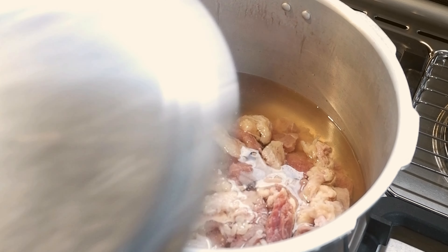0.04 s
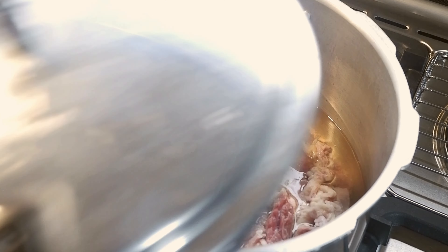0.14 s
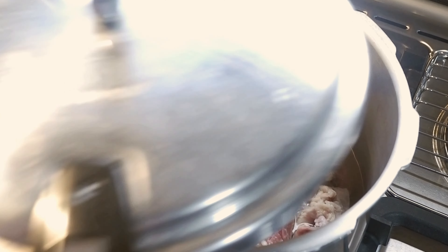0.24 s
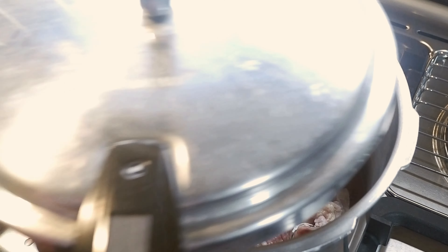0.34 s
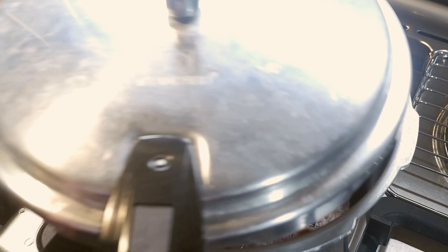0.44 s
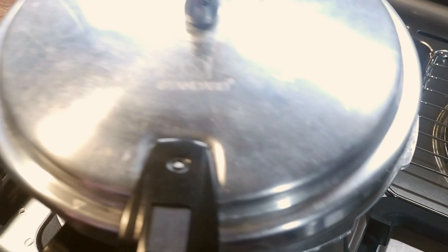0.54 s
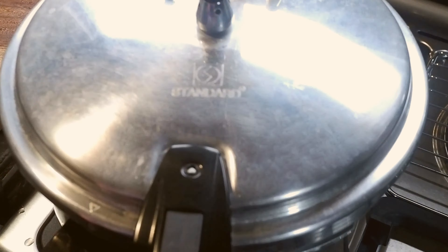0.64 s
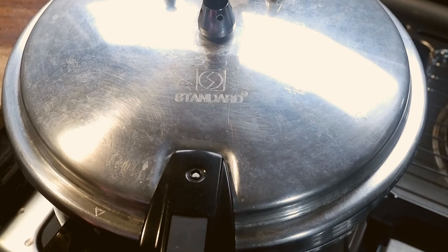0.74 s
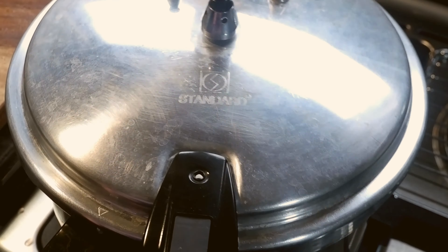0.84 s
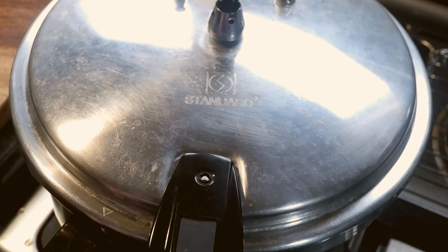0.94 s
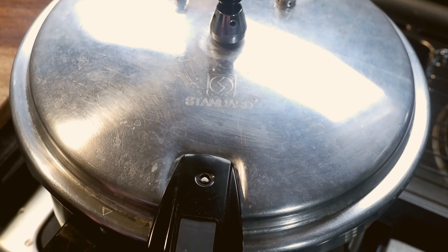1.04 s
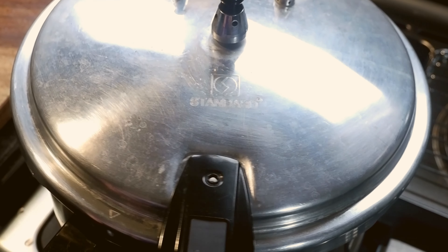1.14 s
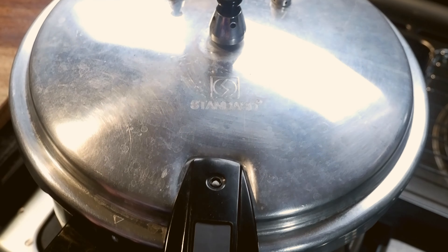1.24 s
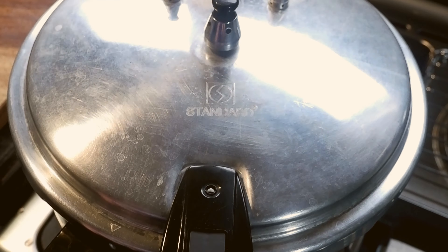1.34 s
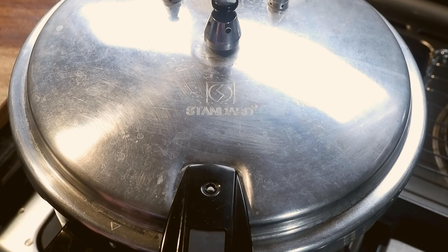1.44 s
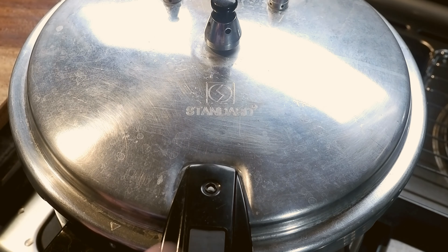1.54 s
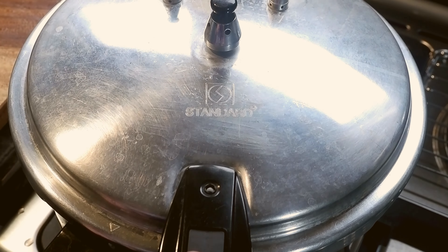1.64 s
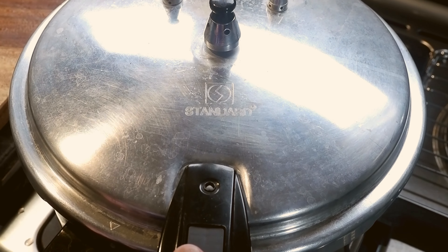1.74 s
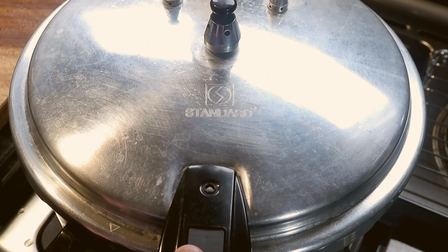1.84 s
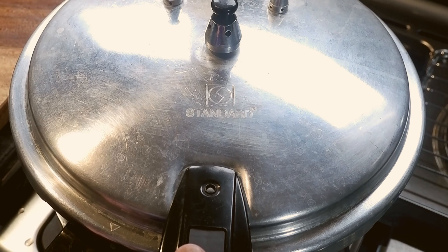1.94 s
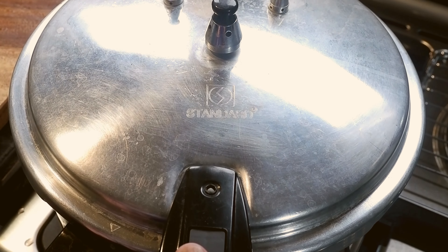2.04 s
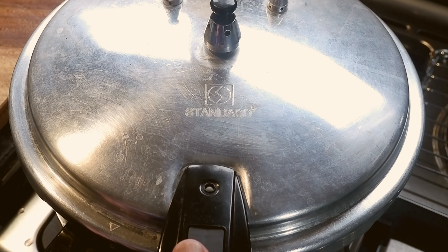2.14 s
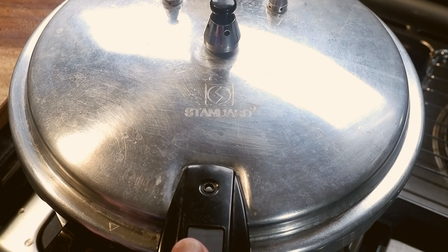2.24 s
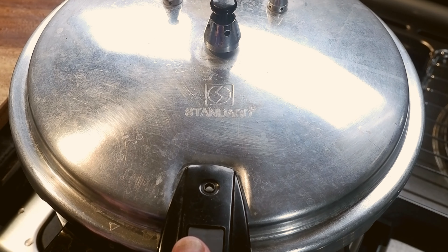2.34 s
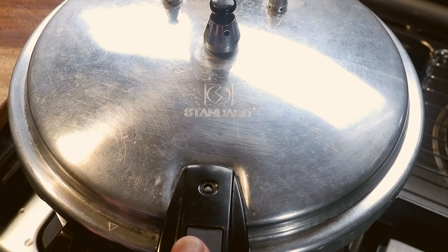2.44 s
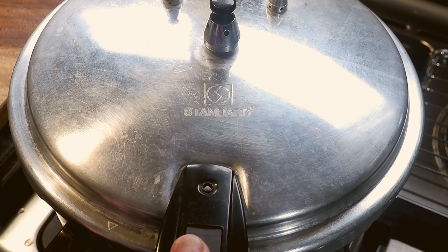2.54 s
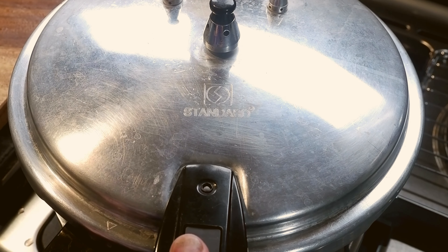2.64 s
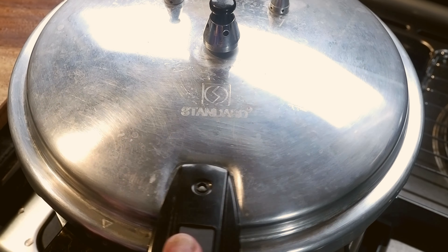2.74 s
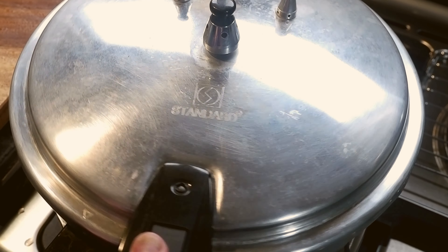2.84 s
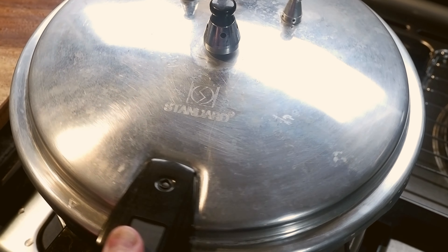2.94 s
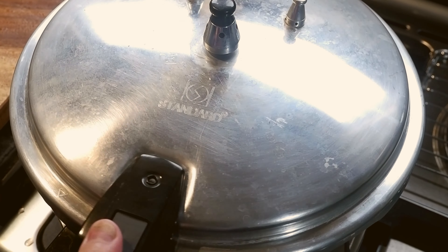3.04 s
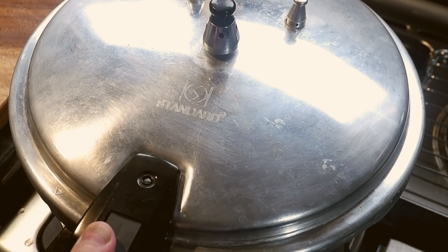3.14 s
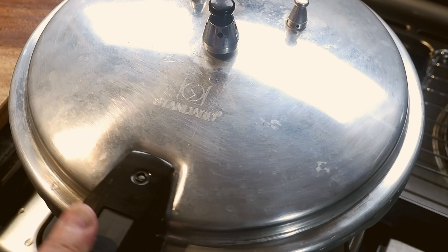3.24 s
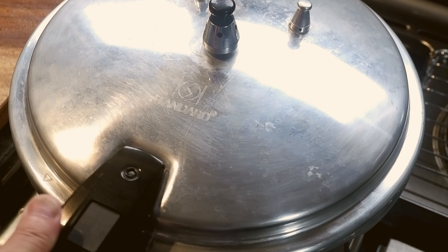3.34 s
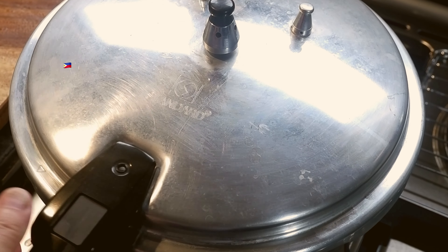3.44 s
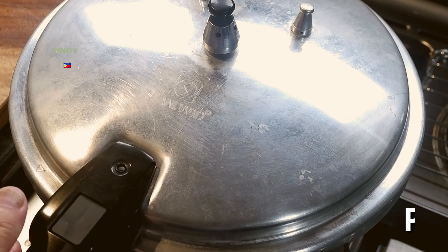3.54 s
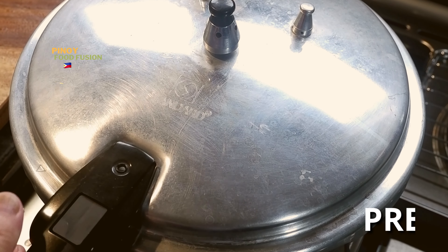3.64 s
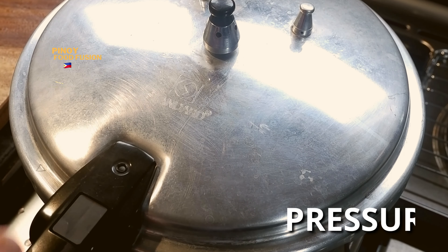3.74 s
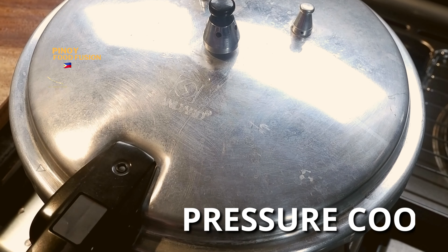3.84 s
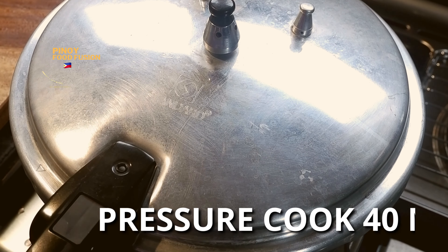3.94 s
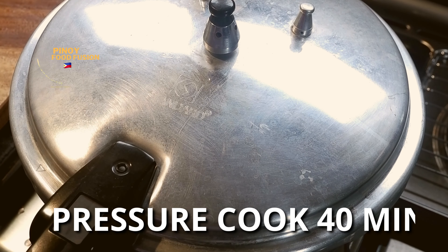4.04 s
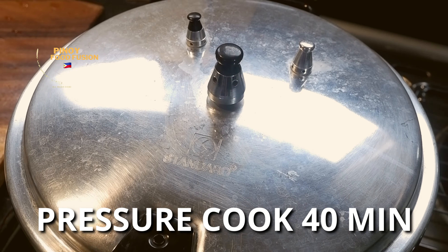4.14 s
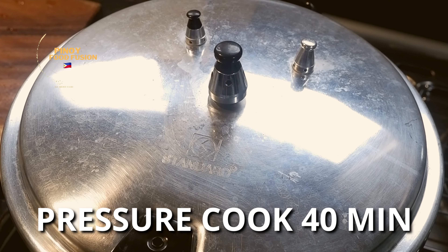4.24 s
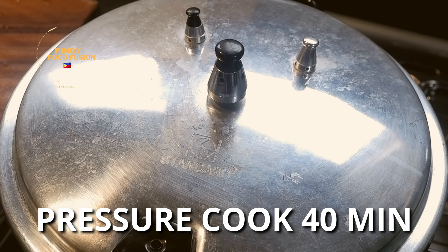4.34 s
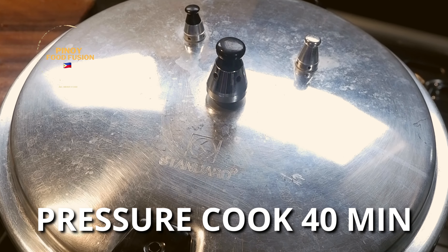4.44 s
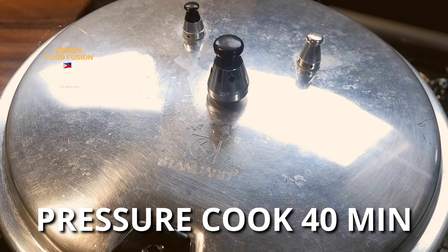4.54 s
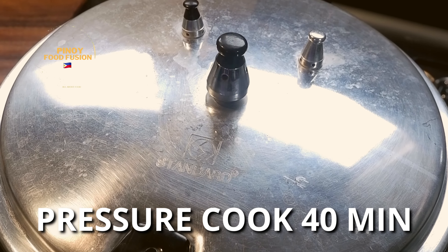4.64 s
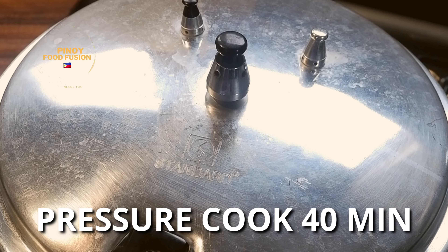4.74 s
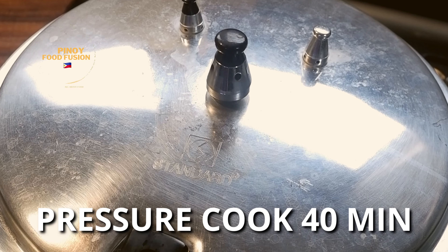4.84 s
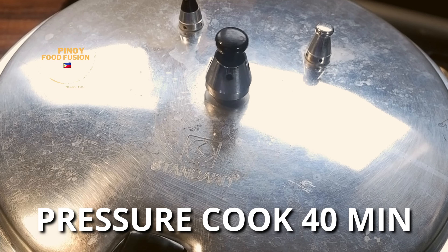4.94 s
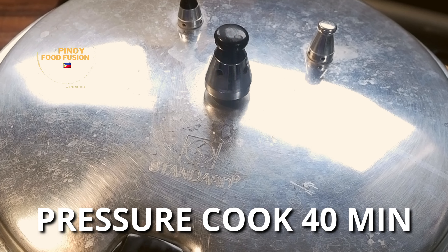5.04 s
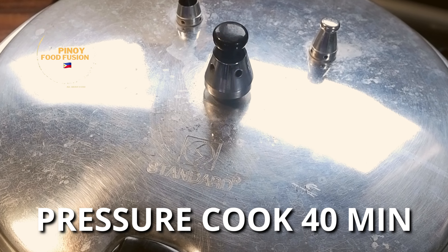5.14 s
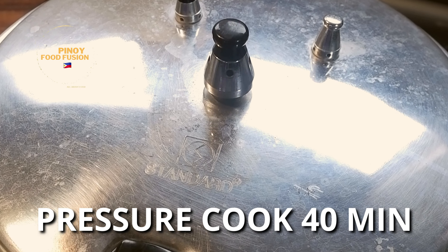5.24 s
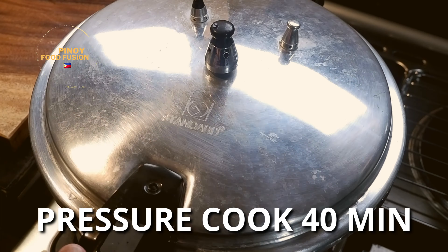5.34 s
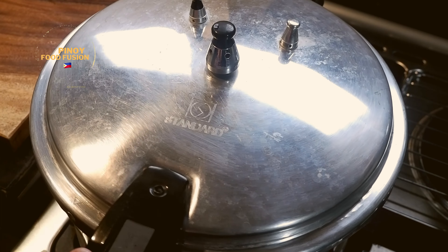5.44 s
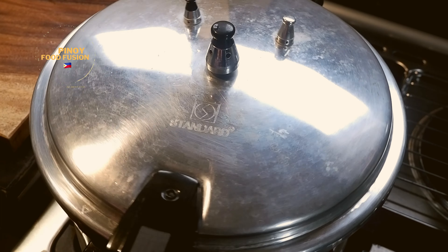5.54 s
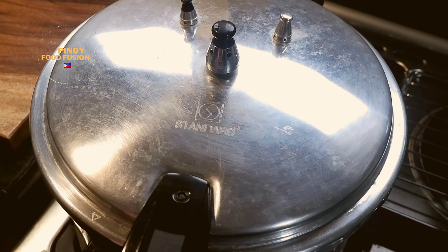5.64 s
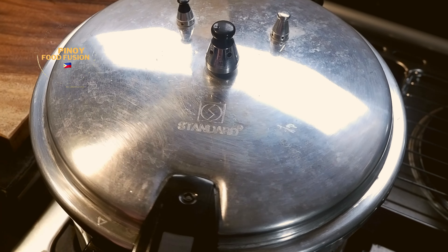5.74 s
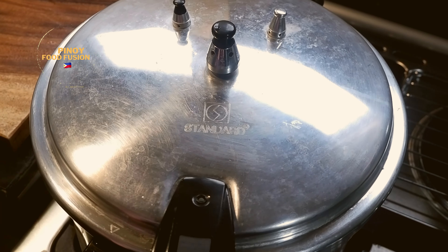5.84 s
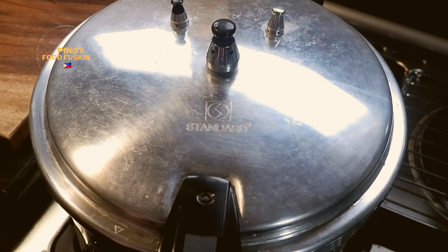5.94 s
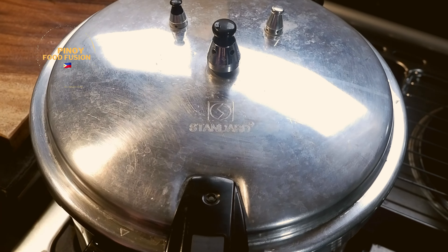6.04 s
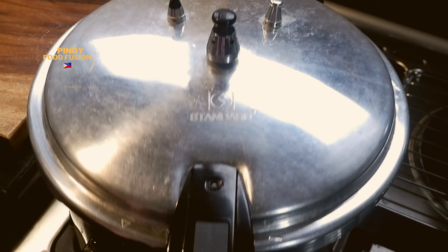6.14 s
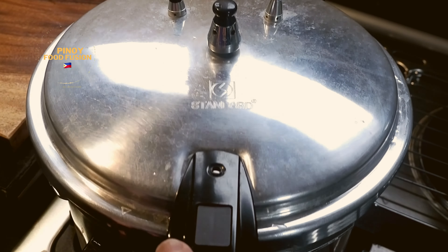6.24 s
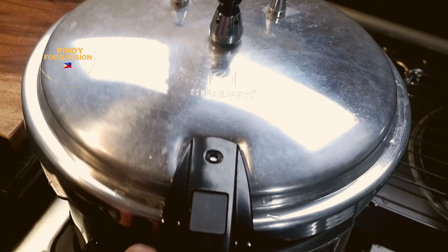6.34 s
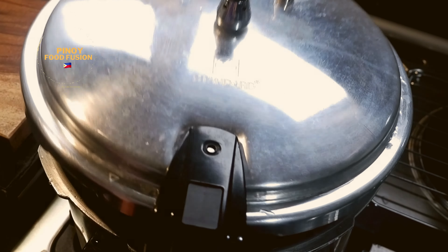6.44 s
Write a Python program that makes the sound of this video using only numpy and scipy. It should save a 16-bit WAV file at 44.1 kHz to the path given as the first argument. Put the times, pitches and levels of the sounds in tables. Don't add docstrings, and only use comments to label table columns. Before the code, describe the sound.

A heavy metal lid knocks and rattles onto a pot, grinds shut with a sharp click, then steam hisses before the lid is turned open.

```python
import sys
import numpy as np
from scipy import signal
from scipy.fft import rfft, irfft, next_fast_len
from scipy.io import wavfile
from scipy.ndimage import uniform_filter1d

SR = 44100
rng = np.random.default_rng(int(sys.argv[2]) if len(sys.argv) > 2 else 0)


def unload_audio(sound):
    columns = np.transpose(np.atleast_2d(sound))
    steps = np.round(np.clip(columns, -1, 1) * 32767)
    wavfile.write(sys.argv[1], SR, steps.astype(np.int16))


def undo_db(level):
    steps = np.asarray(level, float) / 20
    return 10 ** steps


N = 286694
SIZE = next_fast_len(N)
HZ = np.fft.rfftfreq(SIZE, 1 / SR) + 1
T = np.arange(N) / SR


def unit(x):
    return x / np.sqrt(np.mean(x ** 2))


def curve(points, column=1):
    return np.interp(T, np.array(points)[:, 0], np.array(points)[:, column])


def gate(start_s, end_s, edge_s):
    return np.clip(np.minimum(T - start_s, end_s - T) / edge_s + 1, 0, 1)


def away(s, before_s, after_s):
    return np.where(T < s, (s - T) / before_s, (T - s) / after_s)


def colour(points):
    hz, db = np.transpose(points)
    return undo_db(np.interp(np.log(HZ), np.log(hz), db))


def shaped(x, gain):
    return irfft(rfft(x, SIZE) * gain, SIZE)[..., :N]


def band(x, lo_hz, hi_hz):
    return signal.sosfilt(signal.butter(2, [lo_hz, hi_hz], "band", fs=SR, output="sos"), x)


def add(out, s, x, db):
    i = int(s * SR)
    out[:, i:i + x.shape[1]] += undo_db(db) * x / np.abs(x).max()


def walk(rate):
    k = int(SR / rate)
    held = np.repeat(rng.standard_normal(N // k + 1), k)
    return 1.76 * uniform_filter1d(uniform_filter1d(held, k), k)[:N]


def port_noise(n, own):
    noise = rng.standard_normal((3, n))
    return noise[0] + own * noise[1:]


def wide_noise(side_hz):
    mid, side = rfft(rng.standard_normal((2, SIZE)))
    side = side * (HZ + .12 * side_hz) / (HZ + side_hz)
    return np.array([mid + side, mid - side])


def flickering(spec, lo_hz, hi_hz, flicker_db, rate):
    def below(hz):
        return 1 / (1 + (HZ / hz) ** 8)

    out = 0
    for hz in lo_hz * 2. ** np.arange(np.ceil(np.log2(hi_hz / lo_hz))):
        octave = below(min(2 * hz, hi_hz)) - below(hz)
        out = out + undo_db(flicker_db * walk(rate)) * irfft(spec * octave, SIZE)[:, :N]
    return unit(out)


def ring(modes, t, db, stretch, chance):
    hz, own_db, t60 = np.transpose(modes)[:, :, None]
    size = undo_db(own_db + db[:, None] - 60 * t / (t60 * stretch))
    port = np.array([1, -1])[:, None, None]
    phase = 2 * chance[2] + port * chance[1] * hz / 4500
    detuned_hz = hz * (1 + 0.0047 * chance[0])
    return np.sum(size * np.sin(2 * np.pi * detuned_hz * t + phase), axis=1)


def near(modes, hz, lift_db, fall_db):
    octaves = np.abs(np.log2(np.array(modes)[:, 0] / hz))
    return lift_db * np.exp(-(octaves / .12) ** 2) - fall_db * octaves


# start in seconds, gain in dB, drift in dB per s, settling time in seconds.
GAIN_STEPS = [
    (0, 0, 0, .001),
    (3.655, -20, 12, .04),
    (4.249, -21, -4, .001),
    (5.448, -2, 0, .001),
    (6.273, -20, -20, .004),
]


def phone_db():
    out = np.zeros(N)
    for s, db, drift_db_per_s, settle_s in GAIN_STEPS:
        late = np.maximum(T - s, 0)
        out = np.where(T < s, out, db * (1 - np.exp(-late / settle_s)) + drift_db_per_s * late)
    return out


# frequency in Hz, density in dB per Hz.
STREET_COLOUR = [(15, -48), (25, -18.5), (64, -3.5), (227, 1), (260, -3.5), (359, -3), (741, -13.5),
                 (1140, -14.5), (1240, -16), (1620, -19.5), (2770, -28.5), (11800, -44.5), (14300, -55.5),
                 (15500, -77.5)]
# time in seconds, level in dB.
SWELL = [(0, 0), (.55, -2), (1.2, -1), (1.55, 2), (2.05, 3), (2.55, 2), (2.9, 0), (3.2, 1.5), (3.5, -2),
         (5.5, 0), (5.75, 1.5), (6.03, -2), (6.3, 0)]


def street():
    spec = wide_noise(2600) * colour(STREET_COLOUR)
    gain_db, swell_db = phone_db(), curve(SWELL)

    def layer(lo_hz, hi_hz, db, duck, swell, flicker_db, flickers_per_s):
        level = undo_db(db + duck * gain_db + swell * swell_db)
        return level * flickering(spec, lo_hz, hi_hz, flicker_db, flickers_per_s)

    drone = layer(20, 80, -55.5, duck=.72, swell=.7, flicker_db=1.5, flickers_per_s=9)
    rumble = layer(80, 500, -41, duck=.93, swell=1.01, flicker_db=1.5, flickers_per_s=9)
    traffic = layer(500, 1800, -46.2, duck=.93, swell=.6, flicker_db=1.2, flickers_per_s=12)
    tyres = layer(1800, 3500, -56.5, duck=1.08, swell=.5, flicker_db=1.2, flickers_per_s=12)
    air = layer(3500, 16000, -64, duck=1.33, swell=.4, flicker_db=1.2, flickers_per_s=12)
    return drone + rumble + traffic + tyres + air


# time in seconds, firing rate in Hz, level in dB.
BIKE = [(0.0, 77, -52), (0.72, 75.5, -48), (0.95, 66, -44), (1.17, 58.5, -50), (1.33, 60, -45),
        (1.54, 66, -36), (1.82, 59, -38.5), (2.06, 61, -37), (2.27, 61.5, -44), (2.81, 66, -34),
        (3.05, 64, -33), (3.12, 67, -46), (3.6, 69, -37), (3.72, 67, -42), (3.84, 70.7, -38),
        (4.064, 70.9, -36), (4.166, 71.4, -44), (4.246, 71.9, -36)]
# multiple of the firing rate, level in dB.
BIKE_ORDERS = [(1, -11), (2, -2), (3, -7.5), (4, -8), (5, -16), (6, -17), (7, -52), (8, -26)]


def motorbike():
    firing_hz = curve(BIKE) * (1 + 0.0054 * walk(14))
    level_db = curve(BIKE, column=2) + phone_db()
    phase = 2 * np.pi * np.cumsum(firing_hz) / SR
    tone = 0
    for k, db in BIKE_ORDERS:
        wavering = undo_db(db + 1.67 * walk(8))
        tone = tone + wavering * np.sin(k * phase + 0.69 * walk(6.21) + 6 * rng.random())
    return np.sqrt(2) * gate(0, BIKE[-1][0], .002) * undo_db(level_db) * tone


def kitchen(x):
    t = np.arange(int(.4 * SR)) / SR
    bright = port_noise(len(t), .8)
    dull = signal.lfilter([.3], [1, -.7], bright)
    tail = dull * undo_db(-60 * t / 0.27) + .5 * bright * undo_db(-60 * t / 0.2)
    tail = tail * np.clip(t / 0.0075, 0, 1)
    tail = signal.sosfilt(signal.butter(1, 400, "high", fs=SR, output="sos"), tail)
    tail = tail / np.sqrt(np.sum(tail ** 2) / 2)
    return signal.fftconvolve(x.mean(axis=0)[None], tail, axes=1)[:, :N]


# frequency in Hz, density in dB per Hz.
STEAM_COLOUR = [(290, -43), (500, -7.5), (577, -28), (612, -13.5), (782, -18), (852, -3.5), (943, -13),
                (1290, -6), (1410, -9), (2110, -7), (6310, -7), (11600, -8), (15600, -20)]
# time in seconds, depth in dB, sinking and recovering in seconds.
LULLS = [
    (4.25, 3, .01, .15),
    (4.38, 6, .15, .06),
    (4.658, 4, .15, .05),
    (4.932, 6.5, .06, .09),
    (5.056, 7, .03, .08),
    (5.17, 3, .08, .03),
    (5.292, 8, .09, .08),
    (5.45, 2.5, .07, .01),
]


def steam():
    lull_db = 0
    for s, depth_db, sink_s, recover_s in LULLS:
        lull_db = lull_db + depth_db * np.maximum(1 - away(s, sink_s, recover_s), 0)
    spec = wide_noise(2200) * colour(STEAM_COLOUR)
    body = undo_db(-1.5) * flickering(spec, 500, 9000, .8, 25)
    top = undo_db(-5.2 - .3 * lull_db) * flickering(spec, 9000, 16000, .8, 25)
    return gate(4.25, 5.447, .002) * undo_db(-42 - lull_db) * (body + top)


# start and end in seconds, level in dB, low squeak in dB, pitch ratio.
TURNS = [
    (2.99, 3.636, -54.5, -2, 1.0),
    (6.118, 6.262, -51.5, 16.5, 1.05),
]
# frequency in Hz, width in Hz, level in dB.
GASKET = [(3440, 450, 0), (4620, 550, -10), (6300, 1200, -19), (8550, 380, -15), (2000, 700, -9),
          (11500, 1500, -30)]


def gasket():
    out = 0
    for start_s, end_s, db, squeak_db, pitch in TURNS:
        attack = np.clip((T - start_s) / .03, 0, 1)
        drag = attack * gate(0, end_s, .0065) * undo_db(db - 14 * (T - start_s))
        slips = irfft(wide_noise(3000), SIZE)[:, :N] * undo_db(.9 * walk(60))
        resonances = sum(undo_db(d) / (1 + (2 * (HZ - hz * pitch) / width_hz) ** 2) for hz, width_hz, d in GASKET)
        high = shaped(slips, resonances)
        low = shaped(slips * undo_db(0.84 * walk(90)), 1 / (1 + (2 * (HZ - 1090) / 430) ** 2) ** 2)
        out = out + drag * (undo_db(8.0) * unit(high) + undo_db(squeak_db) * attack * unit(low))
    return out


# snap in seconds, peak in dB, ring in Hz, wind-up in seconds, top in Hz.
LATCH = [
    (3.652, -10.5, 1574, .0025, 2523),
    (6.2701, -11, 2900, .004, 2800),
]
# frequency in Hz, level in dB, t60 in seconds.
CATCH = [(1530, 0.1, .03), (2650, -4, .025), (3950, -4, .02)]


def latch():
    out = np.zeros((2, N + SR))
    t = np.arange(int(.1 * SR)) / SR - .012
    for s, db, hz, rise_s, top_hz in LATCH:
        noise = port_noise(len(t), .6)
        settling = .5 * np.exp(-t / 0.0059) + 0.09 * np.exp(-t / 0.0053)
        grind = np.where(t < 0, .5 * np.exp(t / rise_s), settling)
        snap = 3 * np.exp(-(t / .00003) ** 2)
        dull = signal.sosfilt(signal.butter(1, top_hz, fs=SR, output="sos"), noise * grind + snap)
        spring = band(noise * np.exp(-np.abs(t) / rise_s), .8 * hz, 1.18 * hz)
        chance = rng.standard_normal((3, len(CATCH), 1))
        catch = ring(CATCH, t - t[0], np.zeros(len(CATCH)), 1, chance)
        add(out, s + t[0], band(dull, 840, 11000), db)
        add(out, s + t[0], spring, db - 14)
        add(out, s, catch, db - 9)
    return out[:, :N]


# frequency in Hz, level in dB, t60 in seconds.
LID = [(562, -17.5, 0.13), (717, -6.5, 0.039), (789, -4, 0.22), (930, -5.5, 0.25), (1000, -5.5, 0.059),
       (1112, -2.5, 0.094), (1185, -2, 0.077), (1330, -8, 0.18), (1555, 1, 0.056), (1684, -15, 0.244),
       (1754, 0.5, 0.051), (1763, -11, 0.3), (1970, -39, .15), (2110, -10.5, 0.17), (2359, -7, 0.19),
       (2654, -4, 0.062), (3240, -12, 0.15), (3480, -14, .08), (3730, -8.5, 0.06), (4100, -23, 0.051),
       (4770, -17.5, 0.052), (5800, -36, 0.036)]
# frequency in Hz, level in dB, t60 in seconds.
POT = [(180, -20.5, 0.45), (232, -5, 0.11), (277, -11, 0.52), (336.7, -0.5, 0.15), (457.7, 0.5, 0.12)]
# peak in seconds, level in dB, brightness in dB, rise and fall by 20 dB in seconds.
RATTLE = [(0.028, -33, -10, .03, .02), (1.05, -38, -13, .03, .06), (1.09, -19.5, -13, .008, .12),
          (1.176, -29, -18, .008, .055), (1.495, -21.5, -18, .01, .12), (1.55, -20.5, -21, .01, .06),
          (1.86, -32, -20, .01, .13), (1.912, -29, -17, .008, .09), (2.01, -38, -12, .02, .08),
          (2.11, -40, -14, .2, .02), (2.242, -38, -15, .05, .11), (2.41, -39, -11, .05, .2),
          (2.698, -39, -12, .03, .06), (3.055, -13.5, -13, .022, .027), (3.09, -36, -12, .03, .12),
          (5.62, -46, -8, .02, .2), (5.73, -40, -11, .08, .17), (6.008, -37, -23, .1, .065)]


def rattle():
    force = np.array([undo_db(db) * np.exp(-np.log(10) * away(s, rise_s, fall_s))
                      for s, db, _, rise_s, fall_s in RATTLE])
    hits = rng.random(N) < 1500 / SR
    grains = hits * undo_db(3 * rng.exponential(size=N)) * rng.standard_normal(N)
    t = np.arange(int(.1 * SR)) / SR
    modes = LID + POT
    body = ring(modes, t, np.zeros(len(modes)), 0.36, rng.standard_normal((3, len(modes), 1)))
    body = body * np.clip(t / .0007, 0, 1)
    lid = unit(signal.fftconvolve(grains[None], body, axes=1)[:, :N])
    grit = unit(band(grains * (1 + .8 * rng.standard_normal((2, N))), 2200, 5500))
    grit_force = undo_db(np.array(RATTLE)[:, 2]) @ force
    return undo_db(-5.5) * (force.sum(axis=0) * lid + grit_force * grit)


# time in seconds, peak in dB, favoured pitch in Hz, ring time in seconds.
THUDS = [(0.933, -19.5, 263, 0.21), (1.074, -12.5, 215, 0.16), (1.101, -30, 242, 0.065),
         (1.145, -18, 233, 0.14), (1.205, -19, 260, 0.052), (1.236, -11.5, 206, 0.18),
         (1.476, -10.5, 180, 0.084), (1.538, -14.5, 149.7, 0.098), (1.834, -22.5, 273.5, 0.28),
         (1.998, -24, 267.8, 0.11), (2.251, -25.5, 180.7, 0.15), (2.331, -21, 202, 0.1),
         (2.356, -23, 242.1, 0.058), (3.042, -20, 502, 0.067), (3.057, -18, 414, 0.13),
         (3.082, -22, 289, 0.1), (5.799, -30, 287, 0.3), (6.006, -27, 259, 0.13), (6.049, -25, 188, 0.091),
         (6.204, -25.5, 296, 0.061), (6.231, -25, 284, 0.061)]


def thuds():
    out, t = np.zeros((2, N + SR)), np.arange(SR // 5) / SR
    for s, db, hz, ring_s in THUDS:
        modes = POT + [(hz, 3, .12)]
        chance = rng.standard_normal((3, len(modes), 1))
        pot = ring(modes, t, near(modes, hz, 0, 9), np.clip(ring_s / 0.17, .2, 3), chance)
        add(out, s, np.clip(t / 0.0014, 0, 1) * pot, db)
    return out[:, :N]


# time in seconds, peak in dB, favoured ring in Hz, brightness in dB, ring time in seconds.
FLAT_KNOCKS = [(0.113, -42.5, 650, -24, 0.1), (0.935, -7, 1330, -14, 0.18), (.941, -14, 1150, -15.5, 0.073),
               (1.042, -31, 1760, -7.5, 0.3), (1.076, -8, 820, -13.5, 0.16), (1.762, -36, 920, -15, 0.11),
               (3.05, -16, 673.8, -14.5, 0.27), (3.061, -17, 718, -11, 0.18),
               (3.079, -19.5, 717, -16, 0.14), (4.988, -41.5, 1115, -20, 0.1), (5.405, -35, 1000, -20, 0.1),
               (6.166, -22.5, 1000, -13, 0.064)]
SEATING_KNOCKS = [
    (1.175, -24.5, 1380, -27, 0.13),
    (1.237, -10.5, 1750, -19, 0.3),
    (1.537, -14, 1330, -19.5, 0.042),
    (1.834, -12.5, 1760, -10, 0.18),
    (6.005, -24, 784, -29, 0.1),
]
GLANCING_KNOCKS = [(0.02, -31, 2540, -4.5, 0.036), (0.367, -12.5, 1200, -13.5, 0.14),
                   (.374, -19, 1734, -13, 0.07), (.379, -18, 1185, -11, 0.09), (1.477, -12, 1140, -12, 0.1),
                   (1.843, -17.5, 1720, -15, 0.069), (2.002, -22.5, 1770, -15.5, 0.13),
                   (2.13, -24.5, 1620, -30, 0.16), (2.332, -20, 875, -24, 0.08),
                   (3.013, -19, 931, -3, 0.12), (5.7214, -35.5, 2100, 0.1, 0.16),
                   (6.49, -38.5, 1070, -34, 0.1)]


def knocks():
    out, t = np.zeros((2, N + SR)), np.arange(SR // 5) / SR
    touch = np.clip(t / .0008, 0, 1)
    kinds = (FLAT_KNOCKS, 0.1), (SEATING_KNOCKS, 9), (GLANCING_KNOCKS, -21)
    for s, db, hz, bright_db, ring_s, below_db in [(*row, below) for rows, below in kinds for row in rows]:
        modes = LID + [(hz, 4.5, .07)]
        chance = rng.standard_normal((4, len(modes), 1))
        scatter_db = 2.5 * chance[3, :, 0]
        low_modes = np.array(modes)[:, 0] < .85 * hz
        favour_db = near(modes, hz, 3.5, 4.5) + below_db * low_modes + scatter_db
        lid = ring(modes, t, favour_db, np.clip(ring_s / .12, .2, 1.15), chance)
        lid = lid * (np.exp(-t / .007) + .22)
        chatter = 1 + 4 * uniform_filter1d(rng.standard_normal(len(t)), 160) * np.clip(t / .004, 0, 1)
        noise = port_noise(len(t), .8)
        clang = noise * (np.exp(-t / 0.0058) + .3 * undo_db(-60 * t / (0.77 * ring_s)))
        crack = noise * (np.exp(-t / 0.0023) + 0.11 * np.exp(-t / 0.015))
        add(out, s, touch * lid * chatter, db)
        add(out, s, touch * band(clang, 1300, 4020), db + bright_db + 5)
        add(out, s, touch * band(crack, 4300, 8600), db + bright_db - 16)
    return out[:, :N]


def scene():
    pot = band(knocks() + thuds() + latch() + rattle() + gasket(), 130, 12500)
    room = undo_db(-12 + .06 * phone_db()) * kitchen(pot)
    return (pot + room + street() + motorbike() + steam()) * undo_db([[.6], [-.6]])


def top_cut(x):
    return signal.sosfilt(signal.butter(12, 15800, fs=SR, output="sos"), x)


def record(dry):
    return top_cut(dry)


dry = scene()
out = record(dry)
unload_audio(out)
```